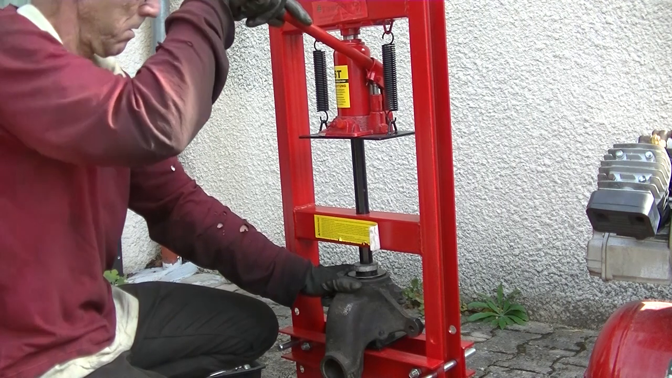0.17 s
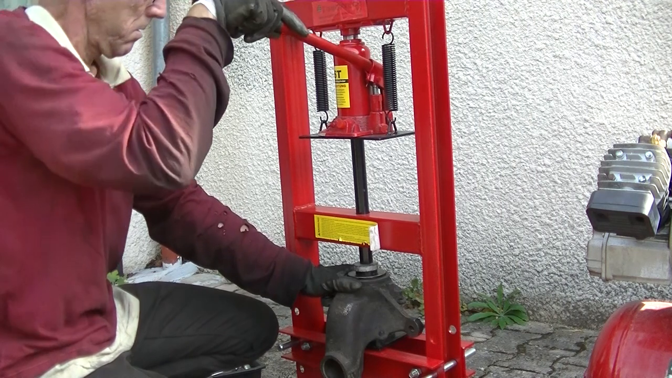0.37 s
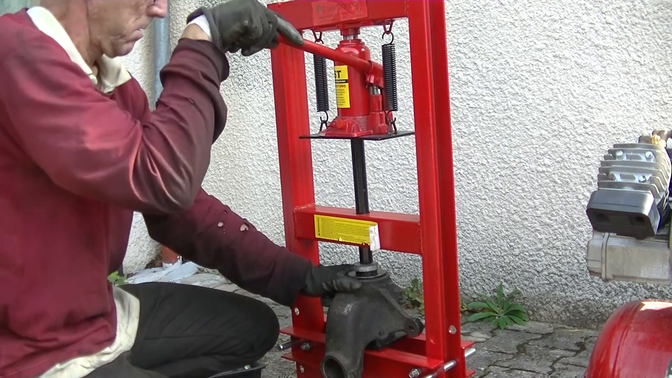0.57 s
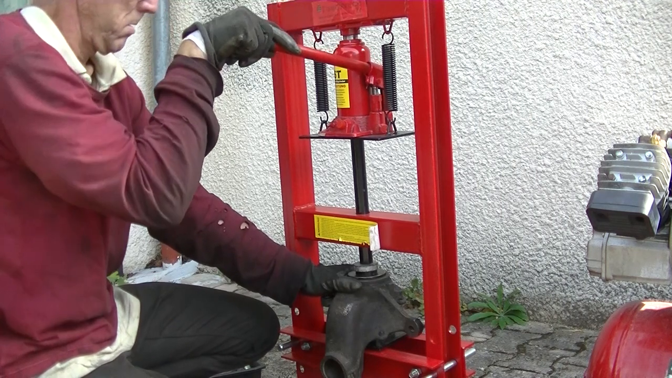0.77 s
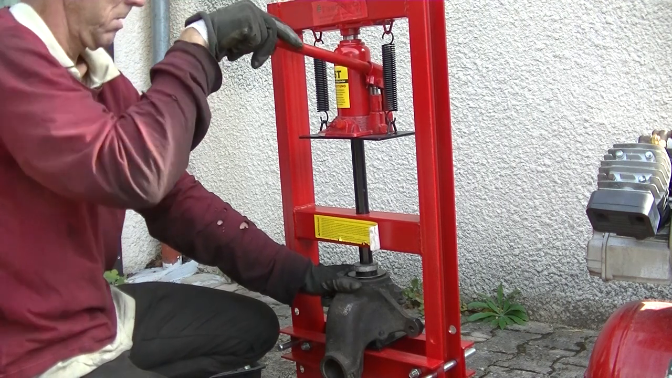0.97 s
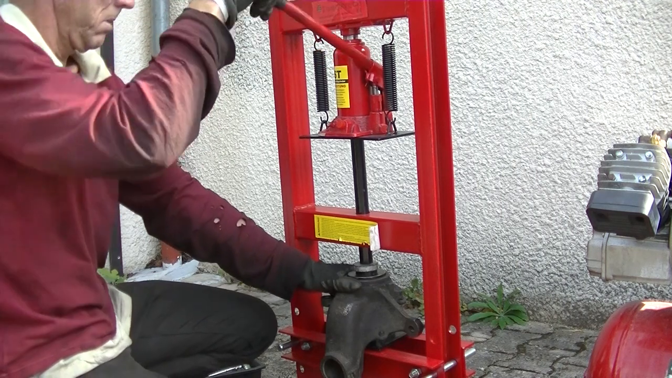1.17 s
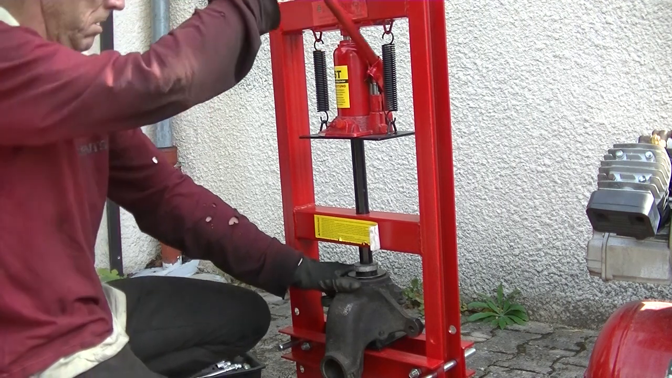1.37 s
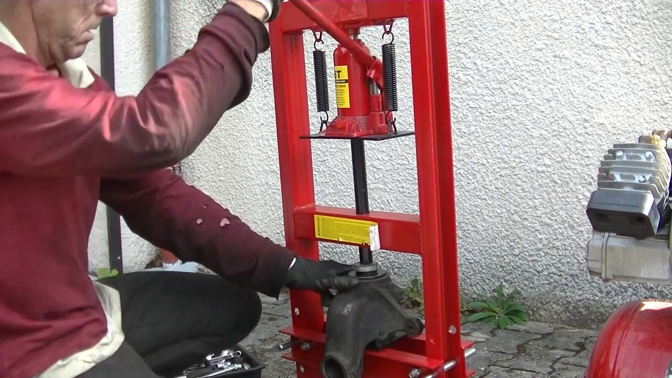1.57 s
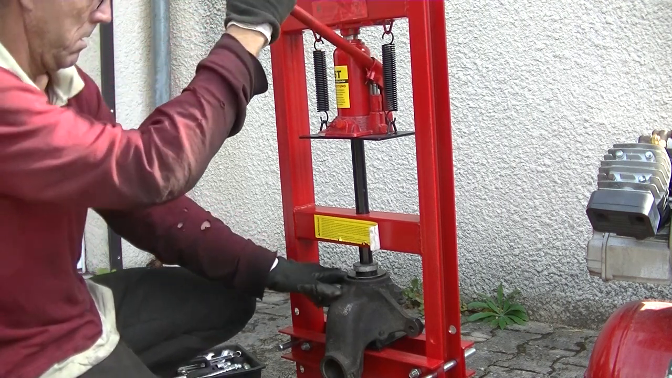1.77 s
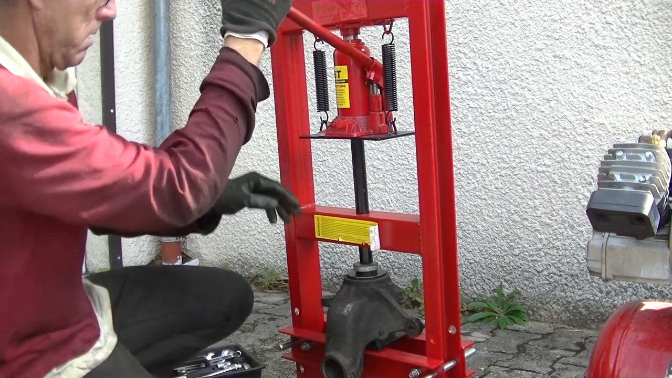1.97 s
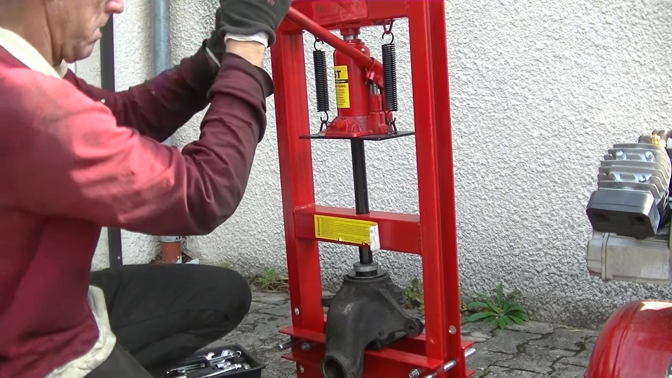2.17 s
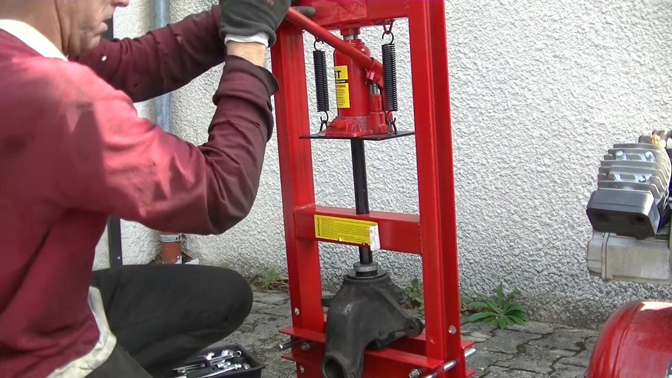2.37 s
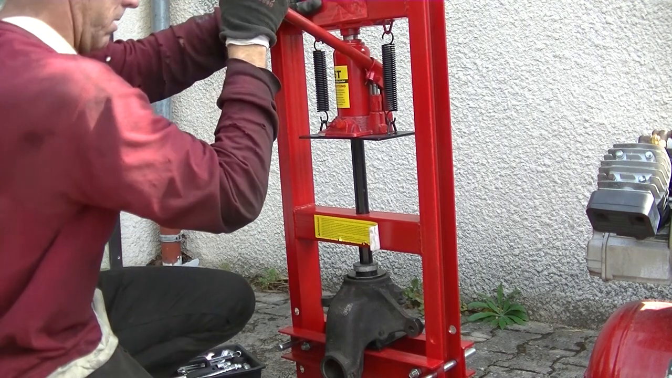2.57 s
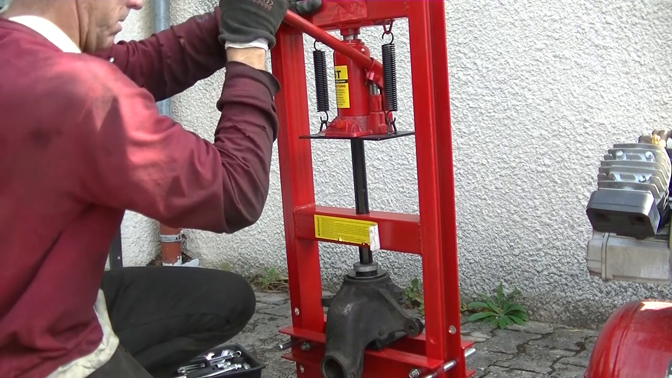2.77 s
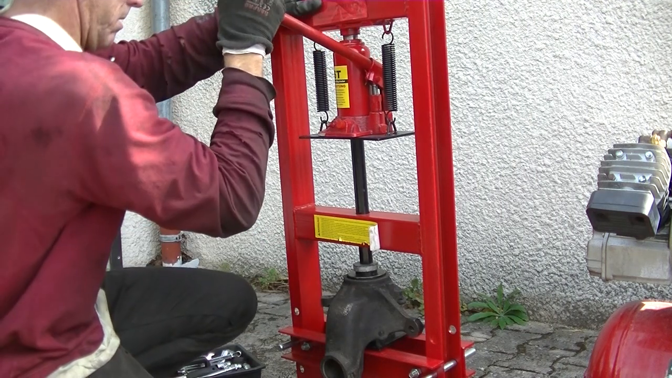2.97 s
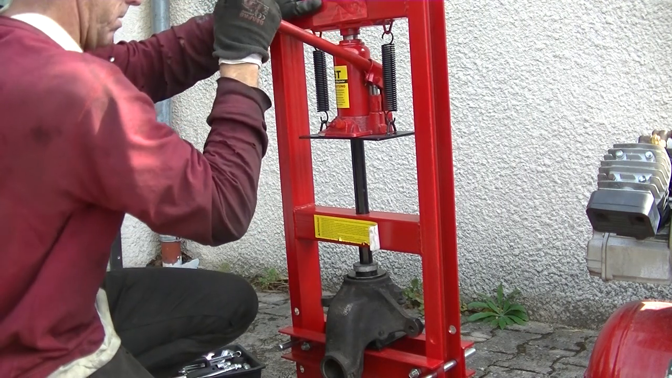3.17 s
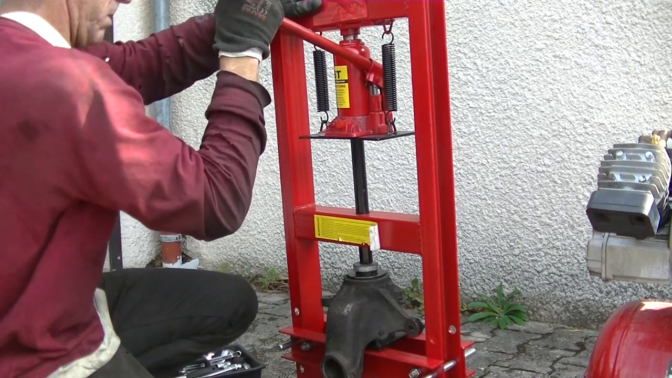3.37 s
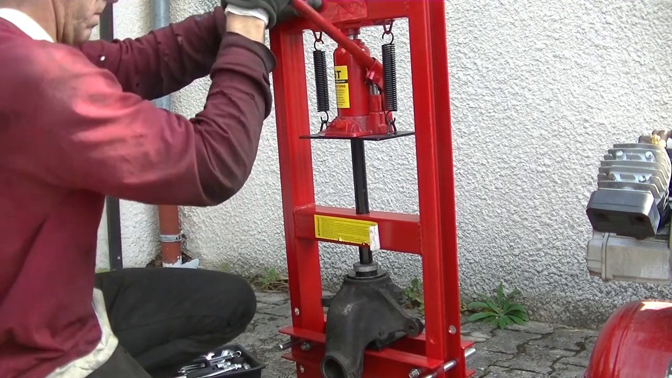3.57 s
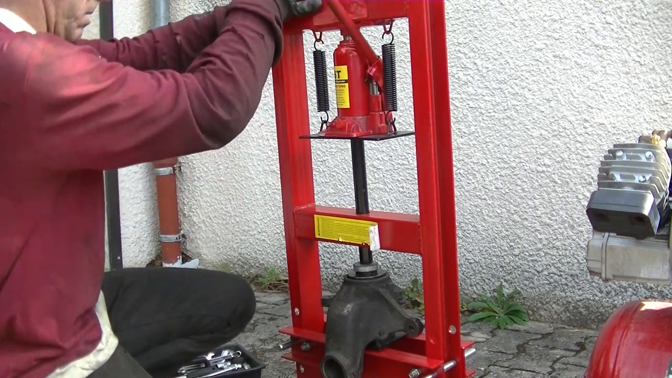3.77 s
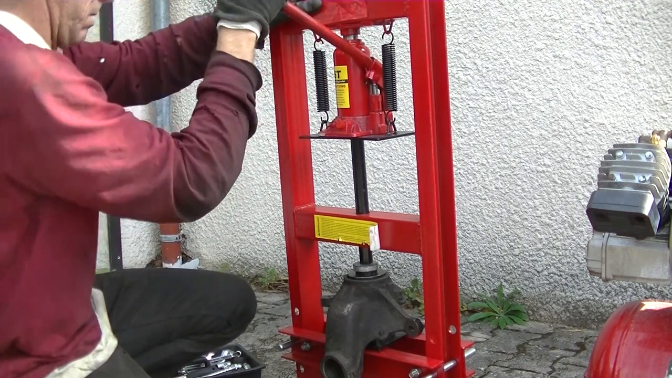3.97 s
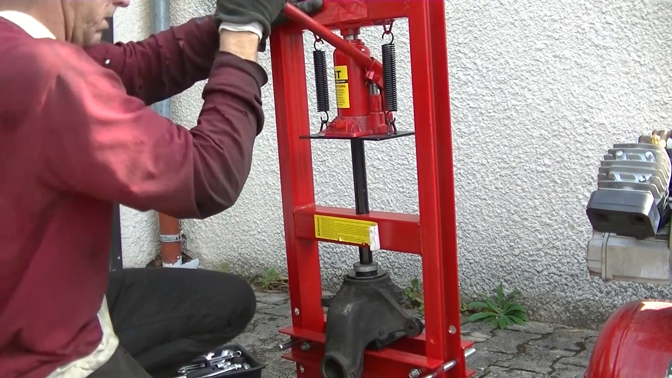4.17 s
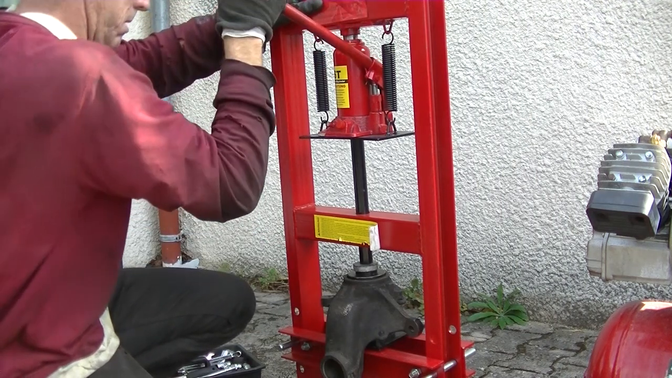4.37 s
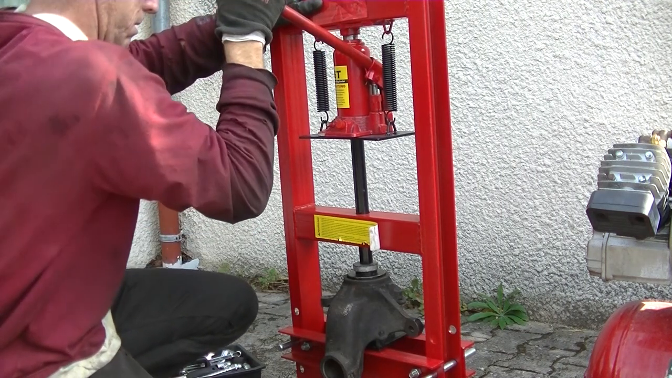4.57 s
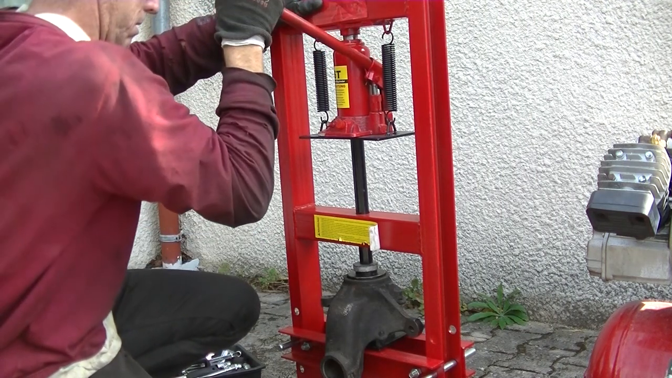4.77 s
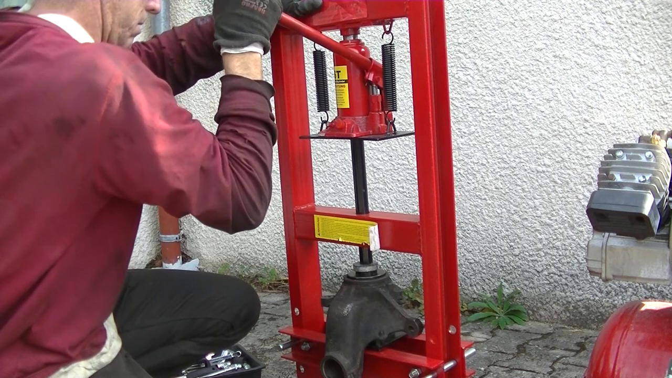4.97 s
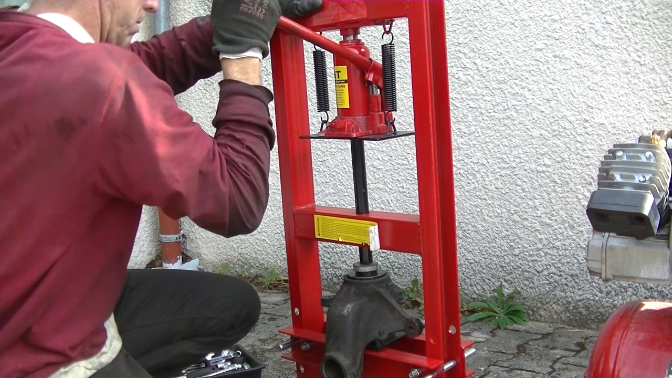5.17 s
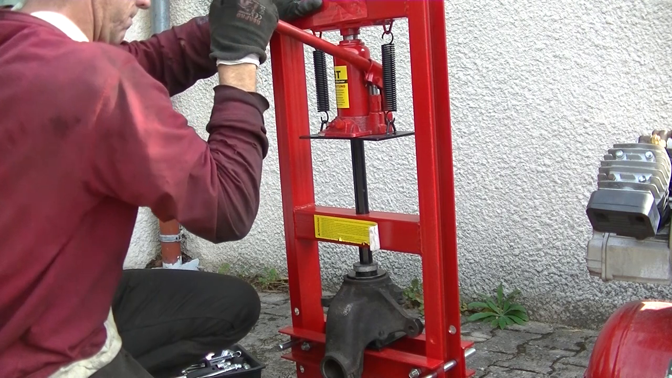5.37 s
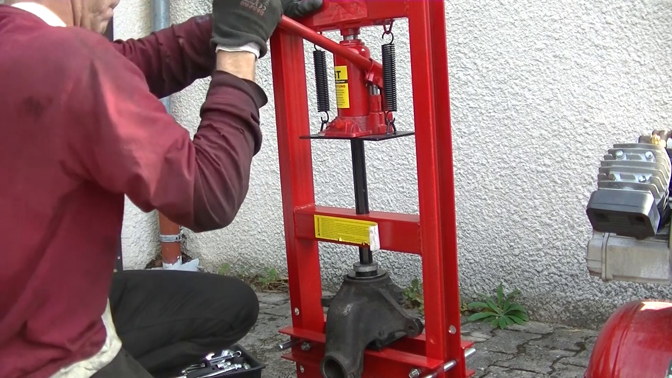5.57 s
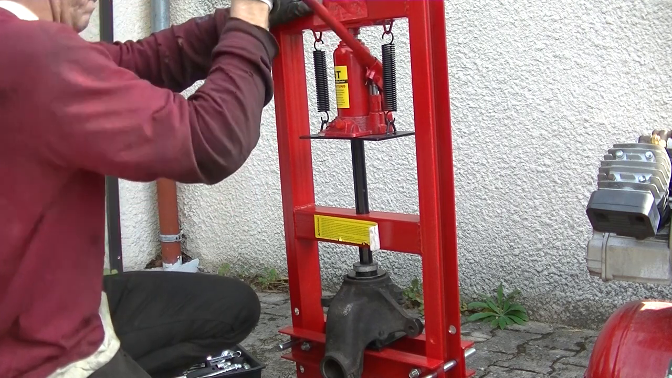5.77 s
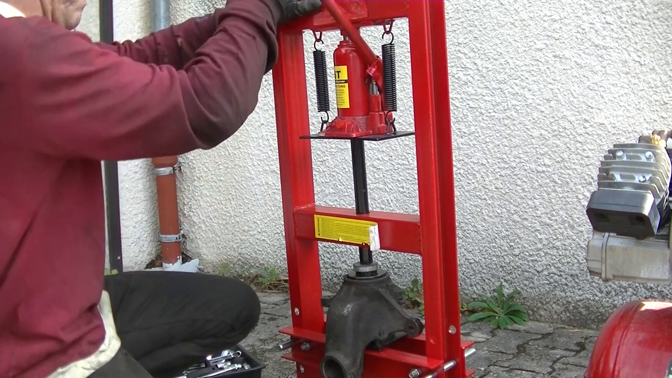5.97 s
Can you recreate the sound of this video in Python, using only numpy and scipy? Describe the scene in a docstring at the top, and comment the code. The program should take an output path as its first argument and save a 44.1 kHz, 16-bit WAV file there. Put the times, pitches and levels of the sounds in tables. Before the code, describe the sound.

Steady soft outdoor hiss with a very faint high whine runs throughout. At the start a low metallic hum dies away, and about 0.3 to 0.5 s there are three faint distant chirps. From 1.05 to 1.4 s a loose lever grates, ticks and squeals, then at 1.45 s comes the loudest, sharpest metal crack with a low thud; another clack follows near 1.6 s. Between 1.9 and 2.8 s only small ticks and light gritty scrapes. At 3.26 s a part pings quietly. At 3.64 to 3.7 s hard bright clanks burst out, followed by rattling clicks near 3.9 s and soft low frame thuds until 4.2 s. Faint grating around 4.5 and 5.3 s, otherwise quiet. From 5.65 s clicks gather into clanks at 5.8 to 5.9 s with a short squeal and thud. Steel rings briefly in an open yard by a wall, a few metres away.

```python
"""Steady outdoor hiss with a low ring dying away and faint far whistles; then a hand lever pumps a bottle jack.
It works a steel shop press in a paved yard, a few metres away. The loose lever and its pins click and chatter:
cracks, ticks, noisy clangs and short squeals. The linkage grates in tiny random slips, and the frame thuds
on the ground as low dying modes. A wall and a sparse, scattered tail return the sound of the steel.
Shaped noise makes the hiss, over a thin wavering whine."""
import sys
import numpy as np
from scipy import signal
from scipy.fft import rfft, irfft
from scipy.io import wavfile
from scipy.ndimage import uniform_filter1d

SR = 44100
rng = np.random.default_rng(int(sys.argv[2]) if len(sys.argv) > 2 else 0)


def digitize_waveform(pressure):
    """Quantize a signal to 16-bit integers and store it at the path in sys.argv[1].

    Rows of a 2-D input are taken as channels; values are limited to [-1, 1].
    """
    field = np.atleast_2d(pressure).T
    bounded = np.clip(field, -1, 1)
    quanta = np.round(bounded * 32767).astype(np.int16)
    wavfile.write(sys.argv[1], SR, quanta)


def to_linear_factor(level_db):
    """Convert decibel levels (scalar or array-like) to linear amplitude factors."""
    exponent = np.asarray(level_db, float) / 20
    return 10 ** exponent


N = 265482  # length [samples]


def evened(x):
    """Scales to an rms of one."""
    return x / np.sqrt(np.mean(np.abs(x) ** 2) + 1e-20)


def read(points, hz):
    """Reads a spectrum table on a log-frequency axis."""
    f, value = np.transpose(points)
    return np.interp(np.log(hz + 1), np.log(f + 1), value)


def add(mix, s, sound):
    """Mixes a sound in at s seconds."""
    part = mix[round(s * SR):][:len(sound)]
    part += sound[:len(part)]


def dying(t, t60):
    """Falls 60 dB in t60 seconds."""
    return to_linear_factor(-60 * t / abs(t60))


def near(f, hz, slope_db):
    """A contact drives the steel most near its own pitch, less by slope_db an octave away."""
    return -slope_db * np.abs(np.log2(f / hz))


def ringing(table, t, luck_db, slow, colour_db=0):
    """Sum of dying modes with chance heights and phases; slow multiplies their decay times."""
    hz, db, t60 = np.transpose(table)[:, :, None]
    luck, phase = rng.standard_normal((2, len(table), 1))
    height = to_linear_factor(db + colour_db + luck_db * luck)
    modes = height * np.sin(2 * np.pi * hz * t + 2 * phase) * dying(t, t60 * slow)
    return modes.sum(0)


RASP_HZ = 500  # sets the width of the noise that roughens a tone


def whistles(table, rasp):
    """Short tones that swell and fade, roughened by rasp times a narrow noise."""
    out = np.zeros(N)
    window = np.hanning(2 * SR // RASP_HZ)[None]
    for s, length, hz, db in table:
        t = np.arange(0, length, 1 / SR)
        smooth = signal.oaconvolve(rng.standard_normal((2, 4096)), window, axes=1)
        a, b = smooth[:, 256:256 + len(t)]
        tone = ((1 + rasp * evened(a + 1j * b)) * np.exp(2j * np.pi * hz * t)).imag
        swell = np.sqrt(np.abs(np.sin(np.pi * t / length)))
        add(out, s, to_linear_factor(db) * swell * tone / np.hypot(1, rasp))
    return out


WHINE_HZ, WHINE_DB = 7830, -83.5


def whine():
    """One faint high tone whose pitch wavers by 19 Hz rms."""
    waver = evened(uniform_filter1d(rng.standard_normal(N), size=2000))
    return to_linear_factor(WHINE_DB) * np.sin(2 * np.pi * np.cumsum(WHINE_HZ + 19.0 * waver) / SR)


# colour of the hiss: (frequency [Hz], relative level [dB])
AIR_COLOUR = [(25, -18), (65, -42), (97, -11), (135, -4), (245, 1.5), (304, 2), (634, -11), (902, -8.5),
              (1280, -11), (6920, -9.5), (15200, -22.5), (16500, -33)]
# likeness of left and right in the hiss: (frequency [Hz], correlation [share])
AIR_LIKENESS = [(60, 0.98), (180, 0.42), (550, 0.7), (1650, 0.67), (4970, 0.165), (15000, 0.18)]
AIR_DB = -57.5  # rms of the hiss


def air():
    """Outdoor and microphone hiss and rumble with faint patches, partly shared by both microphone ports."""
    frames, hz = N // 256 + 5, np.fft.rfftfreq(1024, 1 / SR)
    a, b, c, d, patches = rng.standard_normal((frames, 513, 5)).T
    patches = uniform_filter1d(patches, size=12, axis=0)  # across frequency
    patches = evened(uniform_filter1d(patches, size=14, axis=1))  # across time
    same = np.clip(read(AIR_LIKENESS, hz), -1, 1)[:, None]
    left = a + 1j * b
    right = same * left + np.sqrt(1 - same ** 2) * (c + 1j * d)
    z = np.array([left, right])
    z *= to_linear_factor(read(AIR_COLOUR, hz)[:, None] + .9 * patches)
    hiss = signal.istft(z, nperseg=1024, noverlap=768)[1][:, :N]
    return to_linear_factor(AIR_DB) * evened(hiss)


# faint far whistles: (time [s], length [s], frequency [Hz], level [dB])
CHIRPS = [(0.308, .045, 4400, -65), (.385, 0.048, 4520, -61), (.445, 0.044, 4100, -63)]
# steel still ringing at the start: (frequency [Hz], level [dB], t60 before shortening [s])
FADING = [(2040, -61, 0.23), (2890, -61, 0.28)]


def chirps():
    """A few faint far whistles, perhaps a bird, and the last of an earlier ring of steel."""
    return ringing(FADING, np.arange(N) / SR, 0, 0.78) + whistles(CHIRPS, .9)


# decay of the yard: (frequency [Hz], t60 [s])
YARD_DECAY = [(500, 0.57), (2500, 0.24), (5000, 0.1), (10000, 0.13)]
YARD_DB = -11  # energy of the left tail against the direct sound, before its first 200 samples are cut
WALL_S, WALL_DB = .0115, -30  # delay and level of the wall echo


def yard(x):
    """One hard echo off the wall among sparse taps of random sign, each band dying at its own speed."""
    taps = np.zeros((2, SR // 2))
    at = np.arange(200, SR // 2 - 20, 20) + rng.integers(0, 20, (2, (SR // 2 - 201) // 20))
    np.put_along_axis(taps, at, rng.choice([-1., 1.], at.shape), 1)
    taps[1] = 0.52 * taps[0] + 0.39 * taps[1]  # the sides partly share their taps
    hz, t, z = signal.stft(taps, SR, nperseg=256)
    tail = signal.istft(z * dying(t, read(YARD_DECAY, hz)[:, None]), SR, nperseg=256)[1]
    tail *= to_linear_factor(YARD_DB) / np.linalg.norm(tail[0])
    tail[:, :200] = 0
    tail[:, 0] = 1  # direct sound
    tail[:, round(WALL_S * SR)] += to_linear_factor(WALL_DB)
    return signal.fftconvolve(x[None], tail, axes=1)[:, :N]


# left minus right for the press: (frequency [Hz], level difference [dB])
PORTS_DB = [(1290, -0.5), (2380, -2), (4400, -5), (8120, 5.5), (15000, -13)]
# lead of the left: (frequency [Hz], phase [rad])
PORTS_TURN = [(4650, 0), (7500, -.4), (9700, -1.5), (12800, 0)]


def ports(x):
    """The camera body shades and delays the treble differently for each microphone port."""
    hz, half = np.fft.rfftfreq(256, 1 / SR), np.array([[.5], [-.5]])
    response = to_linear_factor(half * read(PORTS_DB, hz)) * np.exp(1j * half * read(PORTS_TURN, hz))
    taps = np.roll(irfft(response), 128, axis=1)
    return signal.oaconvolve(x, taps, axes=1)[:, 128:128 + N]


# the frame rocking on the paving: (time [s], level [dB], pitch [Hz])
THUDS = [(0, -44.5, 126), (1.255, -43, 148), (1.318, -48, 137), (1.465, -35.5, 125.5), (1.508, -43, 135.6),
         (1.634, -46.5, 135), (1.708, -50.5, 141), (2.406, -46, 129), (3.314, -47.5, 107),
         (3.674, -45, 127), (3.705, -47.5, 132), (3.77, -47, 141), (3.916, -42.5, 129), (3.965, -46, 153),
         (4.01, -37, 137.4), (4.05, -41, 140), (4.129, -50, 152), (4.245, -50, 177), (5.724, -47, 119),
         (5.801, -49, 135), (5.898, -43.5, 127)]
# modes of a thud: (multiple of the pitch, level [dB], t60 before shortening [s])
FRAME_MODES = [(.75, -17, 0.55), (1., -3.5, 0.23), (1.3, -2.5, 0.055)]
HUM_HZ, HUM_DB, HUM_T60 = 153, -56, 2.2  # low ring at the start; t60 in s


def frame():
    """Soft low thuds that swell over a cycle or two, and a low ring fading from the start."""
    out, t = np.zeros(N), np.arange(SR // 2) / SR
    for s, db, hz in THUDS:
        thud = ringing(np.multiply(FRAME_MODES, [hz, 1, 1]), t, 3.2, 0.84)
        add(out, s, to_linear_factor(db) * thud * (1 - dying(t, 0.019)) ** 2)
    t = np.arange(N) / SR
    return out + to_linear_factor(HUM_DB) * np.sin(2 * np.pi * HUM_HZ * t) * dying(t, HUM_T60)


# the loaded linkage grating in its pivots: (start [s], length [s], level [dB])
SCRAPES = [(1.035, 0.37, -48), (1.424, 0.049, -41.5), (1.581, 0.068, -45.5), (1.646, 0.21, -54.5),
           (2.273, 0.032, -56), (2.357, 0.087, -48.5), (2.46, 0.21, -53.5), (2.647, 0.11, -51),
           (3.105, 0.023, -54), (3.635, 0.12, -43.5), (3.872, .12, -48.5), (4.415, 0.18, -55.5),
           (5.207, 0.26, -59.5), (5.637, 0.035, -52), (5.734, 0.25, -51)]
SWELL_DB = 10  # a scrape is this much softer at its ends than in its middle
EDGE_DB_PER_S = 252  # how fast it comes and goes beyond its ends
CREEP_DB = -66.5  # faint grating between scrapes
SHAKE_DB, SHAKE_T60 = -28.5, 0.22  # buzz of the linkage below each crack [dB], and its t60 [s]


def effort():
    """Level of the grating: creep, scrapes and the buzz after each crack add up in power."""
    t = np.arange(0, N + 64, 64) / SR
    start, length, db = np.transpose(SCRAPES)[:, :, None]
    off = np.abs(t - start - length / 2)  # time away from the middle
    swell = SWELL_DB * np.minimum(2 * off / length, 1) ** 2
    edge = EDGE_DB_PER_S * np.maximum(off - length / 2, 0)
    scrapes = to_linear_factor(db - swell - edge)
    s, crack_db = np.transpose(CLICKS)[:2, :, None]
    buzz = (t > s) * to_linear_factor(crack_db + SHAKE_DB) * dying(np.maximum(t - s, 0), SHAKE_T60)
    power = to_linear_factor(CREEP_DB) ** 2 + (scrapes ** 2).sum(0) + (buzz ** 2).sum(0)
    return np.interp(np.arange(N) / SR, t, np.sqrt(power))


# clearest modes of press, jack and lever, also rung by clicks:
# (frequency [Hz], level [dB], t60 before scaling [s])
STEEL = [(496, -9.5, 0.061), (836, -1, 0.13), (1075, 1, 0.11), (1427, -9, 0.74), (1674, -4, 0.38),
         (2212, -9.5, 0.63), (2520, -4, 0.15), (2700, 3.5, 0.15), (3368, 2, 0.26), (3900, 10.5, 0.11),
         (4400, 13, 0.052), (4710, 13.5, 0.097)]
# colour of the grating, in a weaker form also of the clangs: (frequency [Hz], level [dB])
GRIT = [(530, -100), (900, -40), (1310, -23), (1860, 4.5), (2010, 6), (4490, 10), (6560, 3.5), (8350, -9),
        (10400, -0.5), (14000, -28)]


def linkage():
    """Dense tiny slips of uneven size, heard as grit and through short rings of the steel."""
    size = to_linear_factor(2.2 * np.minimum(rng.exponential(1, N), 4)) * rng.standard_normal(N)
    slips = size * (rng.random(N) < 4000 / SR)  # about 4000 a second
    rung = evened(signal.oaconvolve(slips, ringing(STEEL, np.arange(2048) / SR, 0, 0.35))[:N])
    colour = to_linear_factor(read(GRIT, np.fft.rfftfreq(N, 1 / SR)))
    grit = evened(irfft(rfft(slips) * colour, N))
    return effort() * evened(grit + 0.37 * rung)


# small pivot pins: (frequency [Hz], level within the pins [dB], t60 before shortening [s])
PINS = [(6300, 5, 0.05), (8840, 1, 0.06), (10400, 0, 0.1)]
# long thin ring of the frame under every crack: (frequency [Hz], level against the crack [dB], t60 [s])
LINGER = [(870, -50, .12), (1490, -52, .4), (2030, -47, .42), (2490, -44, .28)]
USUAL_DB, USUAL_HZ = -40, 4000  # reference clang level and contact pitch
CLANG_T60 = 0.093  # t60 [s] of the noisy clang at that reference
# log of t60 falls for harder knocks, which seat the parts, and for higher contacts
DAMP_PER_DB, DAMP_PER_OCTAVE = 0.075, 0.2
LOOSE = .03  # each knock detunes its clear modes at random by this share (rms)
CLEAR_CAP_S = .08  # clear modes ring short: clang t60 counts only up to here for them
CRUNCH_DB = 3.2  # loose parts rebound unevenly: rms of the lumps of a few ms in a clang


def click(crack_db, hz, tick_db, clang_db):
    """A crack of a few cycles, a tick that rings the pins, and a clang of crowded modes around the contact pitch."""
    t = np.arange(16384) / SR
    f = np.fft.rfftfreq(len(t), 1 / SR) + 1
    cycles = hz * t
    damping = DAMP_PER_DB * (clang_db - USUAL_DB) + DAMP_PER_OCTAVE * np.log2(hz / USUAL_HZ)
    t60 = CLANG_T60 * np.exp(-damping)

    crack = np.sin(2 * np.pi * cycles) * (1 - dying(cycles, 3)) * np.exp(-(cycles / 6) ** 2)
    crack = crack + ringing(LINGER, t, 0, 1)

    lumps = to_linear_factor(CRUNCH_DB * evened(uniform_filter1d(rng.standard_normal(len(t)), size=90)))
    tick_noise, clang_noise = rfft(rng.standard_normal((2, len(t))) * [np.ones_like(t), lumps])
    tick = evened(irfft(tick_noise * to_linear_factor(near(f, 10050, 14.0)))) * dying(t, 0.01)
    tick = tick + to_linear_factor(-16.5) * ringing(PINS, t, 4, 0.8)

    treble_cut = 29.0 * np.log2(np.maximum(f / 7000, 1))  # dB, above 7 kHz
    colour = to_linear_factor(0.23 * read(GRIT, f) + near(f, hz, 9.3) - treble_cut)
    crowd = evened(irfft(clang_noise * colour)) * dying(t, t60)
    shifted = np.multiply(STEEL, 1 + LOOSE * rng.standard_normal((len(STEEL), 1)) * [1, 0, 0])
    closeness = near(np.array(STEEL)[:, :1], hz, 22)
    clear = ringing(shifted, t, 3, min(t60, CLEAR_CAP_S) / .16, closeness)
    clang = (crowd + to_linear_factor(-6) * clear) * (1 - dying(t, .003))
    return to_linear_factor(crack_db) * crack + to_linear_factor(tick_db) * tick + to_linear_factor(clang_db) * clang


# metal knocks:
# (time [s], crack level [dB], pitch of the contact [Hz], treble tick level [dB], clang level [dB])
CLICKS = [(1.151, -38, 2900, -46, -43), (1.1915, -46, 3950, -57, -44), (1.201, -32, 7300, -32.5, -42),
          (1.2199, -37, 4130, -64, -34), (1.236, -32, 3900, -44, -45), (1.274, -38, 3520, -69, -43),
          (1.283, -34, 4100, -40.5, -36), (1.293, -38, 4570, -68, -42), (1.307, -45, 5200, -40, -49),
          (1.4457, -1.6, 4550, -31, -25), (1.448, -52, 2570, -88, -25.5), (1.459, -17, 4270, -63, -59),
          (1.5724, -36, 3930, -61, -60), (1.5883, -39, 4400, -42, -41), (1.5941, -19, 3930, -32, -32.5),
          (1.627, -33, 4500, -63, -65), (1.937, -43, 3970, -65, -55), (2.281, -52, 4630, -45.5, -64),
          (2.379, -52, 4530, -59, -45.5), (2.55, -44, 4350, -49, -52), (2.722, -39, 5870, -49, -46.5),
          (3.263, -44, 4400, -47, -46), (3.6435, -18, 4250, -25.5, -35), (3.65, -18.5, 4230, -31, -32),
          (3.6827, -15, 4260, -28.5, -23), (3.6845, -17, 2610, -54, -26), (3.6945, -28, 2700, -54, -32),
          (3.743, -34, 7150, -41.5, -45), (3.778, -34.5, 3900, -48, -54), (3.8701, -36, 2440, -65, -50),
          (3.886, -28.5, 4400, -65, -51), (3.9021, -32, 4400, -36, -33), (3.908, -35, 3900, -32, -30),
          (3.9101, -31, 4650, -29, -54), (3.9336, -40, 3900, -56, -41.5), (5.652, -42, 2800, -78, -49),
          (5.6568, -28, 4530, -70, -51), (5.657, -37, 1800, -75, -36.5), (5.661, -37, 2900, -70, -44),
          (5.669, -40, 3760, -70, -54), (5.657, -46, 457, -88, -43.5), (5.736, -41, 3230, -70, -48.5),
          (5.7732, -25, 4770, -64, -52), (5.773, -34, 2300, -80, -35), (5.807, -33, 3080, -61, -41),
          (5.8135, -24, 4600, -29, -36), (5.8215, -17.5, 3900, -32, -31), (5.8365, -14, 4800, -38, -28.5),
          (5.8378, -20, 2540, -66, -27.5), (5.849, -25, 3170, -58, -38), (5.8923, -28.5, 3330, -42, -41),
          (5.9222, -29, 3900, -40.5, -47.5)]
# short rough tones: squeals of the loose lever, and at 3.684 and 5.8132 s the pitched ring within a knock:
# (start [s], length [s], frequency [Hz], level [dB])
SQUEALS = [(1.142, 0.033, 4940, -41), (1.158, 0.0082, 2700, -40.5), (1.186, 0.073, 4950, -42),
           (1.19, 0.021, 8750, -47), (1.198, 0.024, 6300, -42), (1.219, 0.038, 2700, -34),
           (1.306, 0.016, 10300, -50), (1.43, 0.033, 4900, -35), (1.424, 0.031, 2760, -47),
           (3.684, 0.019, 3395, -25), (5.8132, 0.0049, 3900, -19.5), (5.838, 0.029, 4810, -36.5)]
# ring of the pressed part: (frequency [Hz], level [dB], t60 [s])
PING = [(2143, -51, .13), (2552, -51, .16), (6638, -56, .22), (8522, -54, .08)]
PING_S = 3.2624  # the pressed part settles on its plate and rings


def lever():
    """All the knocks and squeals of lever and pins, and the ringing ping of the part."""
    out = whistles(SQUEALS, .9)
    add(out, PING_S, ringing(PING, np.arange(SR // 2) / SR, 0, 1))
    for s, *blow in CLICKS:
        add(out, s, click(*blow))
    return out


MIC_LOW_HZ, MIC_HIGH_HZ = 89.5, 11900  # band the microphone ports pass from the press


def scene():
    """Press through yard and ports, its thuds alike on both sides, over hiss, whine and whistles."""
    press = ports(yard(lever() + linkage())) + frame()
    port = signal.butter(2, [MIC_LOW_HZ, MIC_HIGH_HZ], "bandpass", fs=SR, output="sos")
    return signal.sosfilt(port, press) + air() + whine() + chirps()


def band_limit(x):
    """A steep low-pass at the top of the band."""
    return signal.sosfilt(signal.butter(12, 16670, fs=SR, output="sos"), x)


def record(dry):
    """Delivers the finished stereo mix."""
    return band_limit(dry)


dry = scene()
out = record(dry)
digitize_waveform(out)
```